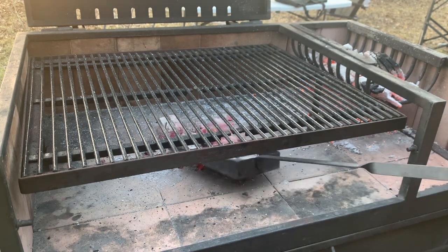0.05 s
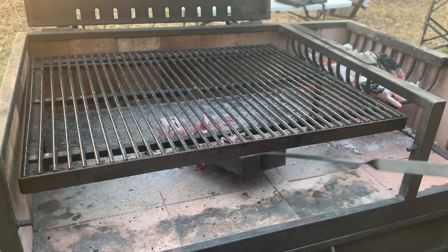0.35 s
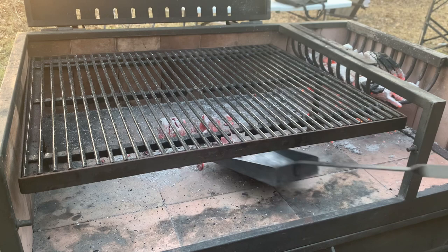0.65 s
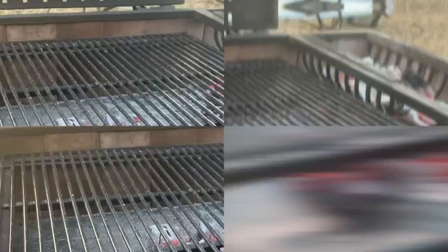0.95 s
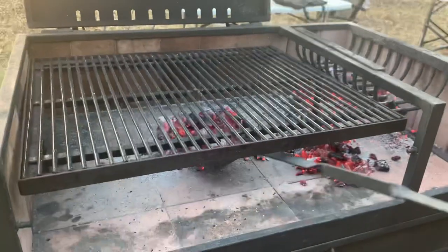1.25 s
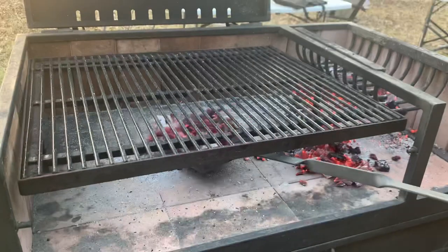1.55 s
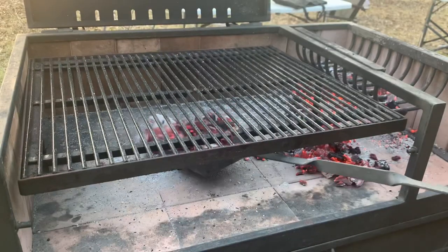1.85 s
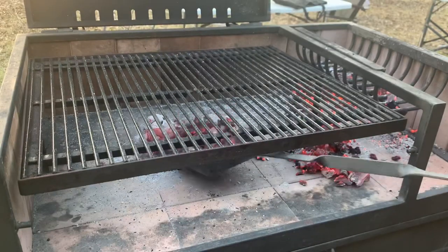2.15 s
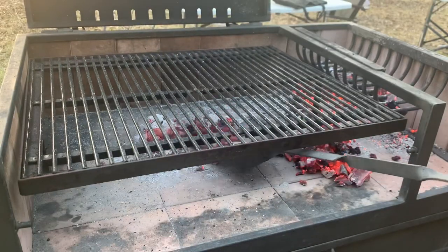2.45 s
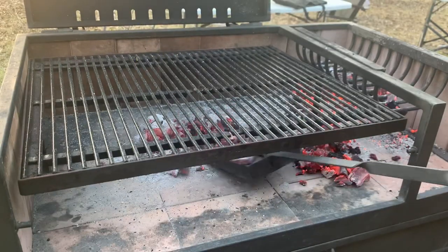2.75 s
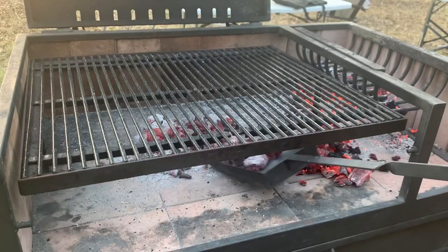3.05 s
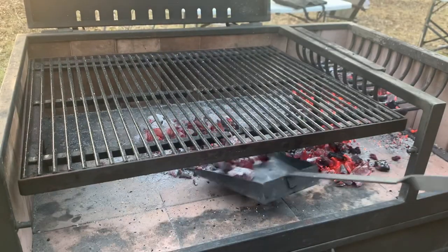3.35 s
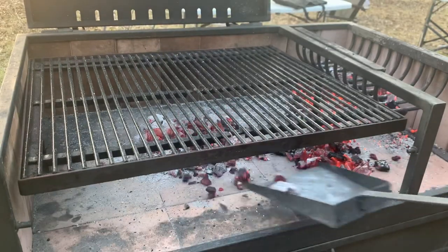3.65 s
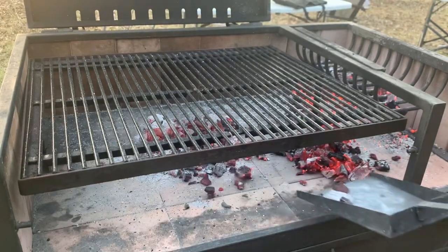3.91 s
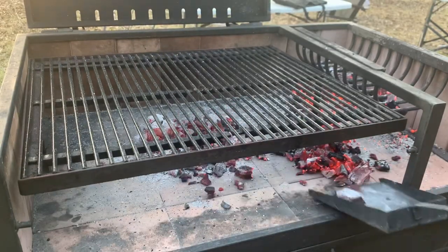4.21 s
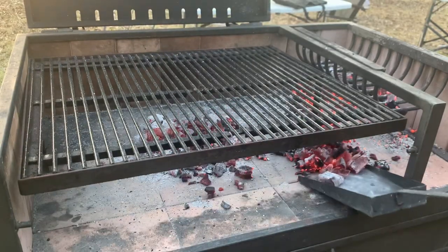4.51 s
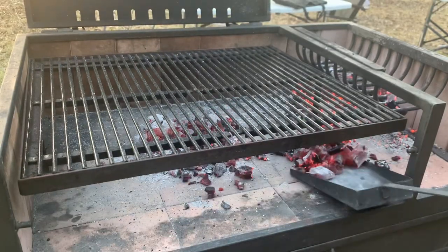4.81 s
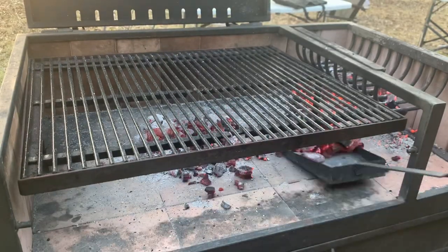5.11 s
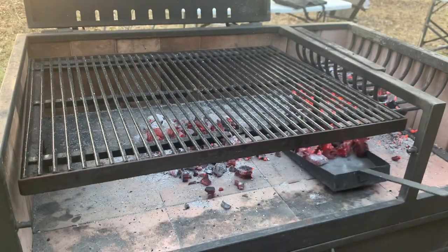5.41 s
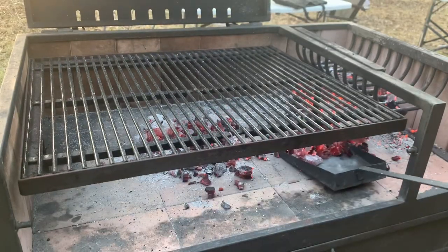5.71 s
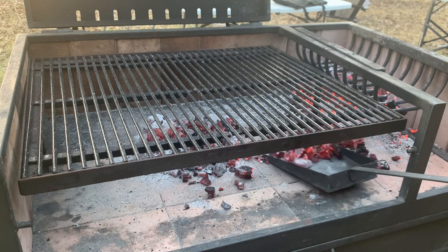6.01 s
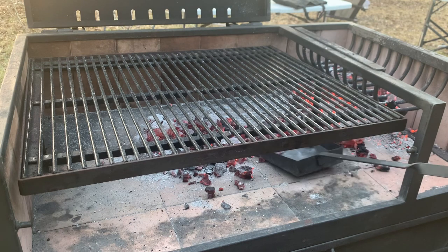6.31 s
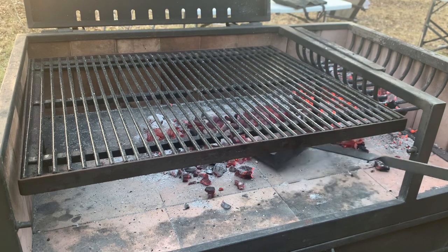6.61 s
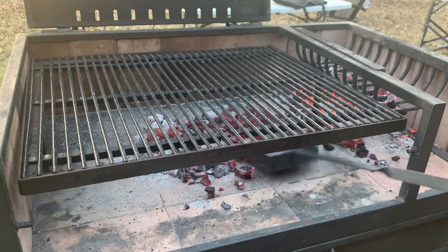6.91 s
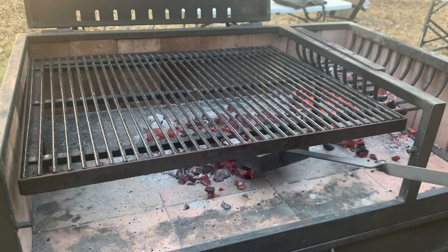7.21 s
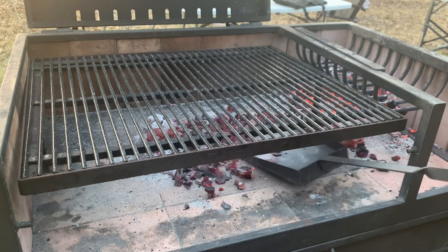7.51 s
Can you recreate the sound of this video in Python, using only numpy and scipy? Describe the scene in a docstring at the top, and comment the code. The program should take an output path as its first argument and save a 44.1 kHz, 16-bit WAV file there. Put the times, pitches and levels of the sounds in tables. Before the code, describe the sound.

A steel shovel works hot charcoal over the tiled floor of a brick barbecue, heard close by outdoors. In the first second it gives a couple of hollow knocks and a short, squeaky scrape. From about 1 to 3.5 seconds it shoves in uneven, gritty strokes, the coals crunching and ticking, with a sharp knock near 2 seconds and the blade ringing around 3. Several lumps drop with glassy clinks at about 3.5 seconds, followed by a brief lull. A loud ringing clank at 4.1 seconds leads into a short metal squeal and more hard knocks near 4.4, 4.7 and 5.1, with dull bumps. Scraping and crunching build again around 6 seconds, peak in a sharp hit and thud near 7, and continue more lightly to the end at about 7.5. Light wind rumbles on the microphone throughout.

```python
"""Shovelling hot charcoal

Outdoors, a steel shovel pushes glowing charcoal over the tiled floor of a brick barbecue.
Grit catches under the blade and rings it; the pan knocks on the tiles and chatters, and lumps
of coal crunch and clink. The hearth walls add a short echo; a light wind buffets the microphone."""
import sys
import numpy as np
from scipy import signal
from scipy.fft import rfft, irfft
from scipy.io import wavfile

SR = 44100
rng = np.random.default_rng(int(sys.argv[2]) if len(sys.argv) > 2 else 0)


def inscribe(sig):
    """Save sig as 16-bit PCM at rate SR to the path in sys.argv[1].

    A 1-D sig is mono; a 2-D sig holds one channel per row.
    Samples are clipped to [-1, 1] before scaling.
    """
    pcm = np.round(np.clip(np.atleast_2d(sig).T, -1, 1) * 32767)
    wavfile.write(sys.argv[1], SR, pcm.astype(np.int16))


N = 333396
TIME = np.arange(N) / SR
TAIL = TIME[:SR]  # one second for a hit to ring out
PAN_EDGE_HZ, ASH_EDGE_HZ, TOP_HZ = 2200, 7500, 15900  # tops of the pan, edge and fine ash registers


def amp(db):
    """Decibels to gain."""
    return 10 ** (np.asarray(db) / 20)


def unit(x):
    """Scale a response to unit energy."""
    return x / np.sqrt(np.sum(x ** 2))


def fade(t, t60):
    """Exponential decay, 60 dB down at t60."""
    return np.exp(-np.log(1000) * t / max(t60, 1e-3))


def convolve(x, response):
    """Pass x through a response, keeping its length."""
    return signal.fftconvolve(x, response)[:len(x)]


def colour(x, points, size=8192):
    """Minimum-phase EQ through (Hz, dB) points, keeping the power of white noise."""
    hz, db = np.transpose(points)
    bins_hz = np.maximum(np.fft.rfftfreq(size, 1 / SR), 1)
    gain = amp(np.interp(np.log(bins_hz), np.log(hz), db))
    cepstrum = irfft(np.log(gain))
    cepstrum[1:size // 2] *= 2
    cepstrum[size // 2 + 1:] = 0
    return convolve(x, unit(irfft(np.exp(rfft(cepstrum)))))


def split(x):
    """Crossover into three registers: pan (low), edge (mid) and fine ash (high)."""
    bands = [(PAN_EDGE_HZ, "low"), ([PAN_EDGE_HZ, ASH_EDGE_HZ], "band"), (ASH_EDGE_HZ, "high")]
    return [signal.sosfilt(signal.butter(4, hz, kind, fs=SR, output="sos"), x) for hz, kind in bands]


def resonate(x, hz, t60):
    """One mode driven by x, keeping the power of white noise."""
    radius = fade(1 / SR, t60)
    feed = np.sqrt((1 - radius ** 2) / 2) * np.array([1, 0, -1])
    return signal.lfilter(feed, [1, -2 * radius * np.cos(2 * np.pi * hz / SR), radius ** 2], x)


def walk(rate):
    """Random modulator with a spread near 1, turning rate times a second."""
    steps = rng.standard_normal(2048)
    return 1.2 * np.interp(TIME * rate, np.arange(len(steps)), steps)


def grains(per_s, spread_db):
    """Tiny fractures of uneven size at random moments; rms 1."""
    size = amp(spread_db * np.minimum(rng.exponential(size=N), 4))
    clicks = (rng.random(N) < per_s / SR) * size * rng.choice([-1, 1], N)
    return clicks / clicks.std()


def hearth(direct_t60, echo_t60, echo_db):
    """Response of a sharp contact with dense reflections between tiles and brick walls."""
    crack, echo = rng.standard_normal((2, SR))
    return unit(unit(crack * fade(TAIL, direct_t60)) + amp(echo_db) * unit(echo * fade(TAIL, echo_t60)))


# Fader ride of the breeze: (time [s], level [dB])
BREEZE = [(0, -42.5), (1, -57), (2.5, -52), (3.3, -40.5), (3.9, -48.5), (5.5, -40.5), (7.56, -44)]
# Low rumble of the wind: (frequency [Hz], level [dB])
WIND_EQ = [(20, -23), (33, -11), (50, 0), (80, 1.5), (130, -5), (200, -13.5), (400, -15.5), (1000, -50.5)]
# Soft garden bed: (frequency [Hz], level [dB])
GARDEN_EQ = [(40, -3.5), (120, -7), (220, -8.5), (400, -15), (800, -7.5), (1400, -11.5), (2200, -30),
             (3500, -32), (5000, -18), (5800, -48), (16000, -85)]


def outdoors(gust_db, gusts_per_s):
    """Gusts rumble on the microphone over the faint hush of the garden."""
    breeze_db = np.interp(TIME, *np.transpose(BREEZE)) + gust_db * walk(gusts_per_s)
    wind = colour(rng.standard_normal(N), WIND_EQ) * amp(breeze_db)
    garden = colour(rng.standard_normal(N), GARDEN_EQ) * amp(-52.5 + 1.2 * walk(rate=1.53))
    return wind + garden


def embers(per_s, level_db):
    """The glowing heap ticks faintly as it burns."""
    cracks = grains(per_s, spread_db=3.0)
    ticks = convolve(cracks, hearth(direct_t60=0.006, echo_t60=0.07, echo_db=-11))
    return amp(level_db) * sum(split(ticks)[1:])


def effort(start, length, attack_s=0.026, release_t60=0.3):
    """Envelope of one move of the arm: it takes hold, keeps on and lets go."""
    t = TIME - start
    return np.clip(t / attack_s, 0, 1) * fade(np.clip(t - length, 0, 2), release_t60)


# Shoves of the shovel, with low and high trims against the edge register:
# (start [s], length [s], level [dB], swell from start to end [dB], pan trim [dB], ash trim [dB])
PUSHES = [(0., 0.24, -52.5, -20.5, 4.5, -3), (0.244, 0.036, -34.5, -14.5, 8.5, 0),
          (0.361, 0.087, -40.5, -4, -0.5, -7), (1.031, 0.021, -44, 6, -5, 0.5),
          (1.278, 0.092, -38.5, -7, -3, 1.5), (1.402, 0.12, -32, 6.5, -2.5, -2.5),
          (1.66, 0.22, -40.5, 5, 2.5, 1.5), (1.904, 0.33, -28.5, -6, -1, -1),
          (2.36, 0.21, -33.5, 3.5, -3.5, -1.5), (2.6, 0.22, -31, -11.5, 1, -6),
          (2.898, 0.17, -31.5, -1, -0.5, -5.5), (3.124, 0.063, -25, 1, 1.5, -5),
          (3.286, 0.071, -33, -15, 2, -20), (3.416, 0.067, -35.5, -0.5, 3.5, -3),
          (4.114, 0.047, -23.5, -6.5, 6.5, -23), (4.202, 0.21, -32, 13.5, 4, -6),
          (4.674, 0.089, -29, 10, 5, -2), (4.843, 0.25, -25, 6.5, -2.5, -1),
          (5.274, 0.068, -38, 8, -1, -0.5), (5.427, 0.18, -41, 1.5, 2.5, 0),
          (5.83, 0.244, -28.5, 0.5, -3, 5.5), (6.062, 0.05, -22, 6.5, -2, 6),
          (6.173, 0.32, -33.5, -14.5, 0.5, 3), (6.366, 0.19, -29.5, -11, 0, -0.5),
          (6.65, 0.26, -42, 6, 4, -3), (6.927, 0.073, -18.5, -7.5, -3.5, -1),
          (7.327, 0.32, -33.5, 3, -6, -7)]
# The shovel drags under its own weight: (start [s], end [s])
DRAGS = [(1.04, 3.55), (4.1, 7.56)]


def pressure(drag_db, drag_pan_db, drag_ash_db):
    """How hard the blade bears down in each register: shoves swell or slacken over a light drag."""
    drag = amp(drag_db) * sum(effort(start, end - start) for start, end in DRAGS)
    power = (amp([[drag_pan_db], [0], [drag_ash_db]]) * drag) ** 2
    for start, length, db, swell_db, pan_db, ash_db in PUSHES:
        progress = np.clip((TIME - start) / length, 0, 1)
        push = effort(start, length) * amp(db + swell_db * (progress - .5))
        power += (amp([[pan_db], [0], [ash_db]]) * push) ** 2
    return np.sqrt(power)


def scraping(slip_db, level_db):
    """Force of the sliding blade for unit pressure: grit sticks and slips under it."""
    slips = amp(level_db + slip_db * walk(rate=90))
    coarse, fine = grains(per_s=2500, spread_db=0.5), grains(per_s=6000, spread_db=0.5)
    return slips * np.array([coarse, (coarse + fine) / np.sqrt(2), fine])


def upper_modes(low_hz, t60, count):
    """Metallic sheen: the response of a thin plate's crowd of weak high modes."""
    t = TAIL[:SR // 2]
    rings = sum(amp(2 * rng.standard_normal()) * np.sin(2 * np.pi * (hz * t + rng.random()))
                for hz in rng.uniform(low_hz, TOP_HZ, count))
    return unit(np.pad(rings * fade(t, t60), (0, SR - len(t))))


# Bite of gritty contact: (frequency [Hz], level [dB])
GRIT_EQ = [(30, -33), (100, -9.5), (160, -7.5), (240, -7), (330, -5), (480, -5.5), (740, -2), (950, -2),
           (1250, 4), (2100, 0.5), (2600, -2.5), (4000, 8), (6500, -4), (9000, -10.5), (12500, -15.5),
           (16000, -19.5)]


def crunching(force, spots, shifts_per_s):
    """Grit cracks in the hearth; the contact shifts between spots that each colour it differently."""
    shares = np.array([walk(shifts_per_s) for _ in range(spots)])
    out = np.zeros(N)
    for share in shares / np.linalg.norm(shares, axis=0):
        crack = hearth(direct_t60=0.021, echo_t60=0.066, echo_db=-3.0)
        sheen = amp(-12) * upper_modes(low_hz=2440, t60=0.095, count=50)
        bands = split(colour(crack + sheen, GRIT_EQ))
        out += sum(convolve(share * drive, unit(band[:SR // 4])) for drive, band in zip(force, bands))
    return out


# Steel modes of the blade and its shaft: (frequency [Hz], level [dB], free t60 [s])
BLADE_MODES = [(752, -8, .35), (798, -8, .5), (1085, -2, .55), (1103, -10, .2), (1269, -2, .55),
               (1300, -11, .3), (1438, -1, .5), (1559, -3, .65), (1730, -10, .3), (1815, -9, .4),
               (1950, -8, .25), (2072, -5, .17), (2380, -9, .4), (2745, -9, .33), (2792, -9, .28),
               (3231, -8, .3), (3378, -11, .35), (3850, -8, .16), (3976, -3, .22), (4114, -6, .25),
               (4436, -3, .27), (4640, -7, .25), (5087, -7, .25), (5630, -8, .22), (5815, -7, .15),
               (6008, -9, .2), (6230, -7, .2), (6520, -9, .25), (7001, -8, .25), (8450, -13, .19),
               (10540, -16, .2)]


def blade_ring(force, damping, contact_db):
    """The floor damps the blade; as the contact point wanders it favours other modes."""
    out = np.zeros(N)
    for hz, db, t60 in BLADE_MODES:
        drive = force[int(hz > PAN_EDGE_HZ)] * amp(contact_db * walk(rate=7))
        out += amp(db) * resonate(drive, hz, t60 / damping)
    return out


def tumbling_coals(load, level_db, range_db, count=3000):
    """Chips pushed by the blade crack against each other, each a dry tick of its own colour."""
    out, t = np.zeros(N + SR), TAIL[:SR // 40]
    for when, pitch, smallness, *partials in rng.random((count, 7)):
        i, hz = int(when * N), 2800 * 3 ** pitch
        modes = np.sin(2 * np.pi * hz * np.outer(1 + np.array(partials), t))
        ring = modes.sum(axis=0) * fade(t, 100 / hz)
        register = 1 + int(1.4 * hz > ASH_EDGE_HZ)  # edge or ash, by the tick's centre
        out[i:i + len(t)] += load[register, i] * amp(level_db - range_db * np.sqrt(smallness)) * ring
    return convolve(out[:N], hearth(direct_t60=0.011, echo_t60=0.029, echo_db=-16.5))


# Blade hits on tiles and coals; bright ones land edge first, dark ones pan first:
# (time [s], level [dB], brightness [dB], hardness [dB])
BLADE_HITS = [(0.0444, -50, -14, 12), (0.15, -36, -5, -8), (0.1771, -36, 13, 9), (.246, -19, 9, -6),
              (0.2629, -29.5, -7, 8), (0.506, -33, 8.5, -6), (.584, -28, -3, 0), (0.6091, -27, -6.5, 9.5),
              (0.8305, -45, 5, 4), (0.883, -47, 6, 10.5), (0.9108, -38, -0.5, 4), (1.0367, -41.5, -5.5, 8),
              (1.1729, -27, 9.5, 6), (1.2982, -25, 0, 1), (1.3983, -21, 4, 2.5), (1.4238, -21, 8.5, 3),
              (1.6245, -26.5, 7, 6.5), (1.7072, -21, 2, -0.5), (1.741, -22.5, 10, -3),
              (1.7993, -23, 7.5, 7), (2.0659, -10.5, 8.5, -2), (2.4085, -31.5, -2, 10.5),
              (2.5476, -26.5, 23, 1), (2.8454, -28, -4, 2), (2.9824, -17.5, -4, -4), (3.136, -35, 14, 8),
              (3.3033, -17, 9, 1.5), (4.0981, -9, -5, -7), (4.1381, -23.5, -13, 0),
              (4.3076, -30.5, -18.5, 3), (4.4181, -9.5, 2, 3.5), (4.6684, -25, -4.5, -8),
              (4.7141, -10, 7, 5), (5.1174, -12, 6, 4), (5.429, -35, -8, 3), (5.6047, -22, 15, -3),
              (5.775, -44.5, 29, -5), (6.1675, -22, 2, 10.5), (6.7408, -26, 4, 1.5),
              (6.8034, -32, -13.5, 0.5), (6.936, -10.5, 11, 10), (7.0817, -31, -9.5, 3.5),
              (7.126, -22.5, 2, -8.5), (7.271, -23, 3.5, -4), (7.3544, -22, 3, -21), (7.501, -29.5, 18, 1)]


def knocking(blow_db, chatter_db, chatter_t60, pan_db, ash_db):
    """Force of each knock: one blow, then dying chatter that settles sooner after a hard hit."""
    force = np.zeros((3, N + SR))
    rattle = grains(per_s=3300, spread_db=0.5)
    for start, db, bright_db, hard_db in BLADE_HITS:
        i = int(start * SR)
        push = amp(chatter_db) * np.roll(rattle, -i)[:SR] * fade(TAIL, chatter_t60 * amp(-hard_db))
        push[0] += amp(blow_db + hard_db)
        force[:, i:i + SR] += amp(db) * amp([[pan_db - bright_db], [0], [ash_db + bright_db]]) * push
    return force[:, :N]


# The edge catches and sings: (peak time [s], half width at half height [s], level [dB], pitch [Hz])
EDGE_SQUEALS = [(0.049, 0.011, -32.5, 1090), (0.164, 0.01, -35.5, 1087), (0.288, 0.016, -27, 1100),
                (0.44, 0.066, -43.5, 779), (4.283, 0.1, -27.5, 1088), (6.25, 0.065, -31.5, 1265),
                (6.684, 0.022, -34, 1090), (6.762, 0.025, -26.5, 1107), (7.007, 0.026, -26.5, 1083),
                (7.018, 0.044, -30, 1280), (7.421, 0.031, -27.5, 1087), (7.548, 0.064, -35.5, 1090)]


def squeals(waver, rough_db):
    """Stick-slip locks on to one mode for a moment, unsteady in pitch and strength."""
    wavering_time = np.cumsum(1 + waver * walk(rate=200)) / SR
    tones = np.zeros(N)
    for peak, half_width, db, hz in EDGE_SQUEALS:
        swell = 1 + np.cos(np.pi * np.clip((TIME - peak) / (2 * half_width), -1, 1))
        tones += amp(db - 4) * swell * np.sin(2 * np.pi * hz * wavering_time)
    return tones * amp(rough_db * np.tanh(walk(rate=69)))


# Dull thuds, hollow clunks and short low bumps on the microphone:
# (time [s], level [dB], pitch [Hz], t60 [s])
THUDS = [(0.265, -26.5, 237, 0.11), (.258, -27.5, 676, 0.31), (.584, -26.5, 724, 0.43),
         (0.615, -33.5, 212, 0.34), (3.33, -32.5, 92, 0.13), (4.104, -37, 200, 0.19),
         (4.108, -31, 353, 0.78), (4.446, -29, 141, 0.51), (5.125, -19, 140, 0.16),
         (5.139, -31.5, 216, 0.88), (5.382, -16.5, 60.6, 0.055), (5.578, -15.5, 99, 0.039),
         (6.042, -28, 152, 0.13), (6.953, -31, 188, 0.23), (6.996, -10.5, 106, 0.048)]


def thuds(rise_s, looseness):
    """Dull bumps: each a soft, rattling push on one broad resonance."""
    out = np.zeros(N + SR)
    for start, db, hz, t60 in THUDS:
        i = int(start * SR)
        envelope = (1 - np.exp(-TAIL / rise_s)) * fade(TAIL, t60)
        body = resonate(rng.standard_normal(2 * SR), hz, 1 / (looseness * hz))[SR:]
        out[i:i + SR] += amp(db - 2.0) * unit(body * envelope) * np.linalg.norm(envelope)
    return out[:N]


# Open ring-outs of the blade:
# (time [s], level [dB], tilt [dB/octave], favoured frequency [Hz], decay [x free t60])
REBOUNDS = [(.266, -36, -16, 1087, 1.3), (.61, -52, -11, 750, 0.93), (2.638, -24.5, 5, 1560, 0.88),
            (2.85, -26.5, 0, 781, .77), (2.982, -29.5, 3, 1560, 1.6), (3.166, -22, 1.5, 2780, 1.7),
            (3.185, -28, 1, 1267, 2.7), (3.304, -27, -4, 2420, 2), (3.321, -30, 0, 1100, 3.2),
            (4.1, -18, -7, 1445, 1.05), (4.418, -5, -2.5, 2390, 0.067), (4.711, -10.5, 1.5, 2090, 0.25),
            (7.084, -31, 1, 1110, 0.88)]


def free_ring(favour_db, grip_s, choked_t60):
    """Rebounding from the tiles, the blade rings on; the striking point favours some of its modes."""
    out = np.zeros(N + SR)
    mode_hz, mode_db, mode_t60 = np.transpose(BLADE_MODES)
    for start, db, tilt_db, favoured_hz, stretch in REBOUNDS:
        i = int(start * SR)
        nearness = np.exp(-(np.log(mode_hz / favoured_hz) / .04) ** 2)
        gains = unit(amp(mode_db + tilt_db * np.log2(mode_hz / PAN_EDGE_HZ) + favour_db * nearness))
        ring = sum(gain * fade(TAIL, t60 * stretch) * np.sin(2 * np.pi * (hz * TAIL + rng.random()))
                   for gain, hz, t60 in zip(gains, mode_hz, mode_t60))
        attack = 1 - fade(TAIL, 0.0048)
        # At grip_s the shovel is drawn clear and a firm grip chokes whatever still rings.
        gripped_s = np.maximum(start + TAIL - grip_s, 0) * (start < grip_s)
        out[i:i + SR] += amp(db + 1.5) * ring * attack * fade(gripped_s, choked_t60)
    return out[:N]


# Slides of the loaded pan: (start [s], length [s], level [dB])
LOADED_SLIDES = [(1.06, 0.93, -49), (2.55, 0.94, -56), (5.855, 0.8, -48)]
# Low body of those slides: (frequency [Hz], level [dB])
DRONE_EQ = [(60, -14), (110, -12.5), (155, 6.5), (200, -3), (260, -2.5), (330, -5), (450, -14.5),
            (900, -24)]


def drone():
    """The weight of the coals rumbles through pan and floor."""
    rumble = colour(grains(per_s=750, spread_db=4.0), DRONE_EQ)
    return rumble * sum(amp(db) * effort(start, length) for start, length, db in LOADED_SLIDES)


# Loose coals land on the tiles: (time [s], level [dB], pitch [x usual lump])
LANDINGS = [(1.661, -19, 1.1), (2.55, -29, 1.63), (3.457, -18.5, 1.03), (3.5354, -17, 0.8),
            (3.553, -11.5, 0.95), (3.584, -19.5, 1.08), (3.647, -33, 1.9), (6.85, -29, 3.9),
            (7.128, -45, 0.25)]
# Glassy modes of the usual lump of charcoal: (frequency [Hz], level [dB], t60 [s])
LUMP_MODES = [(2650, -8, .05), (3610, -3, .08), (4290, -2, .07), (5739, -2, .06), (7687, -1, .06),
              (11050, -4, .035), (11400, -7, .06), (14250, -3, .035)]


def coal_clinks():
    """Hard, glassy lumps tick and ring; each landing favours other modes."""
    out = np.zeros(N + SR)
    for start, db, pitch in LANDINGS:
        i, ring = int(start * SR), np.zeros(SR)
        for hz, mode_db, t60 in LUMP_MODES:
            if hz * pitch < TOP_HZ:
                gain = amp(mode_db + 2 * rng.standard_normal())
                ring += gain * fade(TAIL, t60 / pitch) * np.sin(2 * np.pi * hz * pitch * TAIL)
        tick = 2.6 * rng.standard_normal(SR) * fade(TAIL, 0.005)
        out[i:i + SR] += amp(db - 10.5) * (amp(-3.5) * ring + tick)
    return out[:N]


def scene():
    """Shovel, coals and open air in mono; knocks and scrapes drive both the crunch and the blade."""
    load = pressure(drag_db=-50.5, drag_pan_db=0.5, drag_ash_db=2.5)
    force = knocking(blow_db=13.0, chatter_db=-7.5, chatter_t60=0.093, pan_db=2, ash_db=-12)
    force += load * scraping(slip_db=3.0, level_db=-2.0)
    shovel = amp(-2.5) * crunching(force, spots=4, shifts_per_s=8)
    shovel += amp(-13.5) * blade_ring(force, damping=2.12, contact_db=3.0)
    shovel += free_ring(favour_db=11, grip_s=3.55, choked_t60=0.79)
    shovel += squeals(waver=0.024, rough_db=5) + drone()
    coals = coal_clinks() + tumbling_coals(load, level_db=1.0, range_db=21.5)
    coals += embers(per_s=18, level_db=-73.5)
    bumps = thuds(rise_s=0.0032, looseness=0.11)
    return (shovel + coals + bumps + outdoors(gust_db=3.5, gusts_per_s=16))[None]


def record(dry):
    """Master chain: drop the deepest rumble, round the highest peaks and cut the top."""
    thinned = signal.sosfilt(signal.butter(4, 36, "high", fs=SR, output="sos"), dry)
    return signal.sosfilt(signal.ellip(10, .2, 80, TOP_HZ, fs=SR, output="sos"), np.tanh(thinned))


dry = scene()
out = record(dry)
inscribe(out)
```